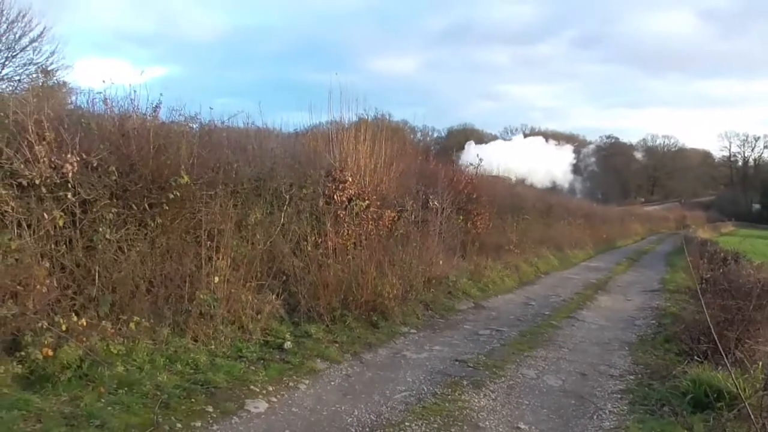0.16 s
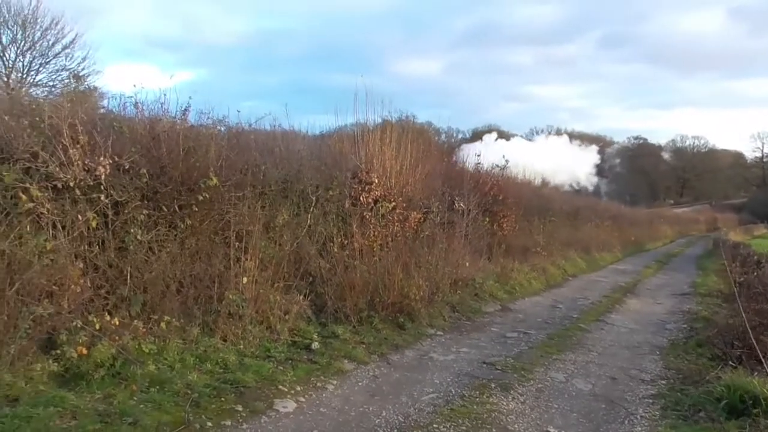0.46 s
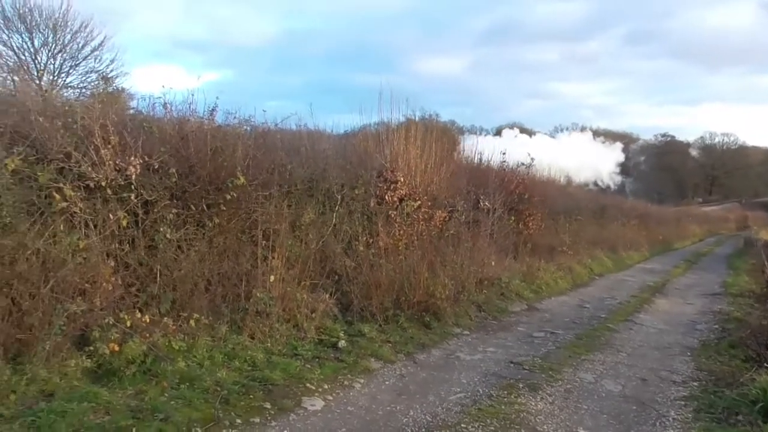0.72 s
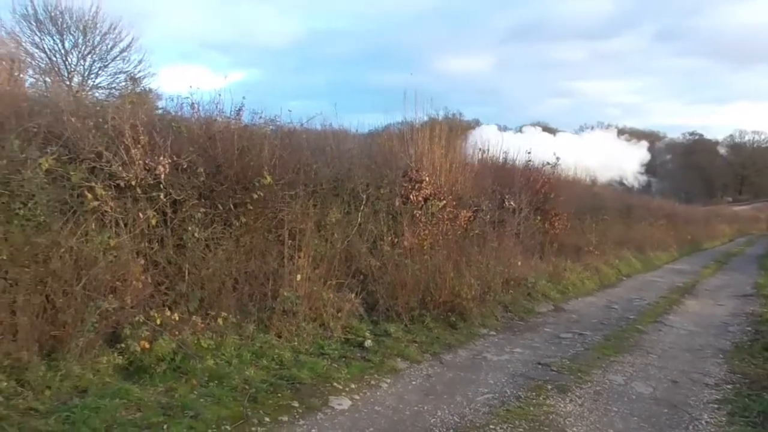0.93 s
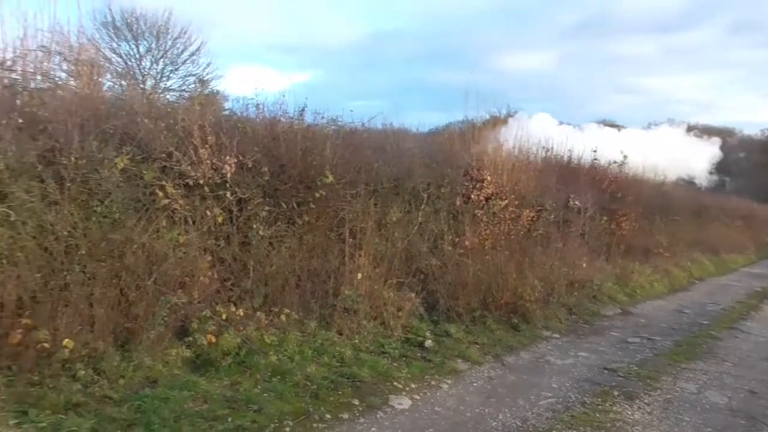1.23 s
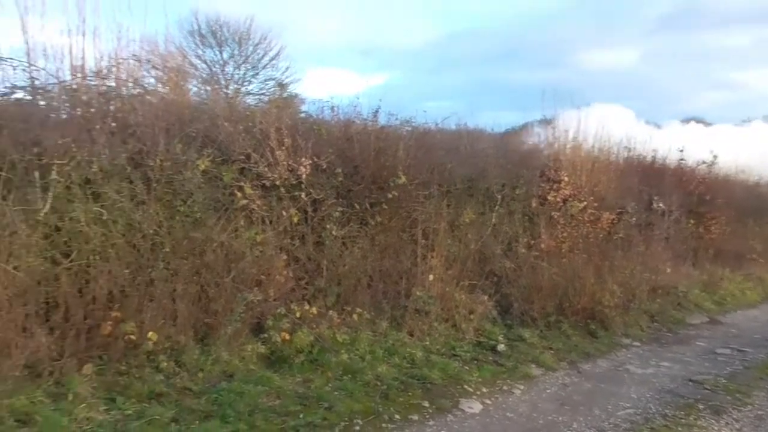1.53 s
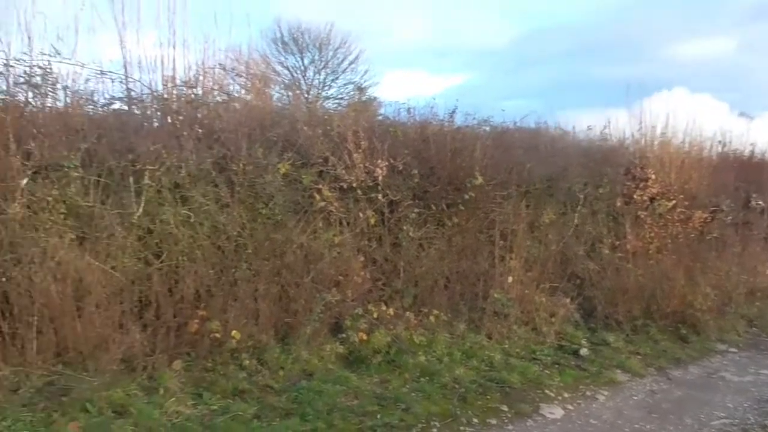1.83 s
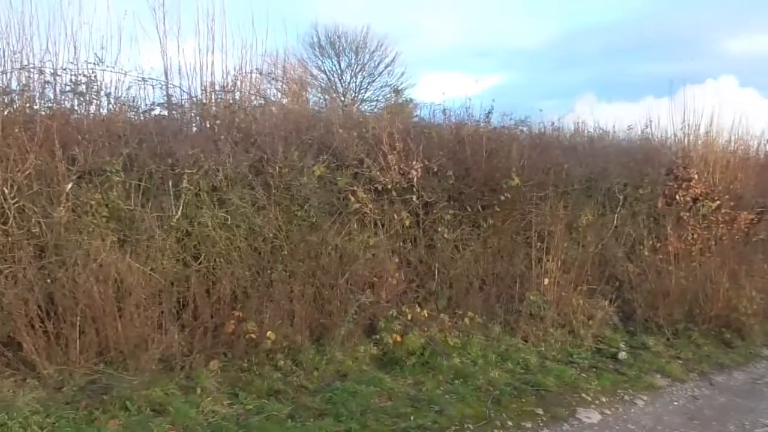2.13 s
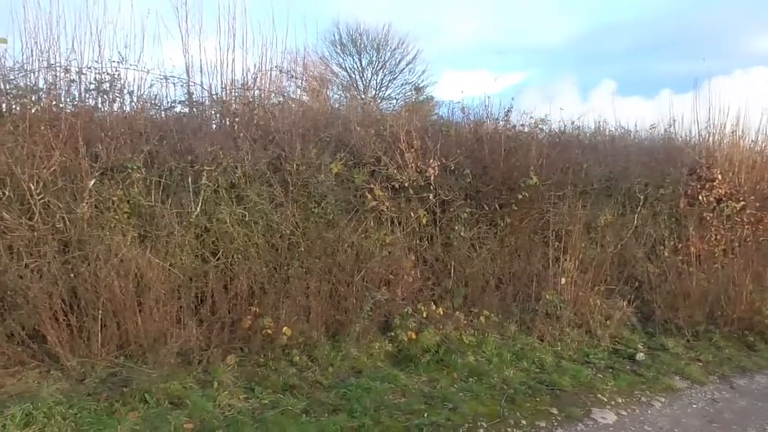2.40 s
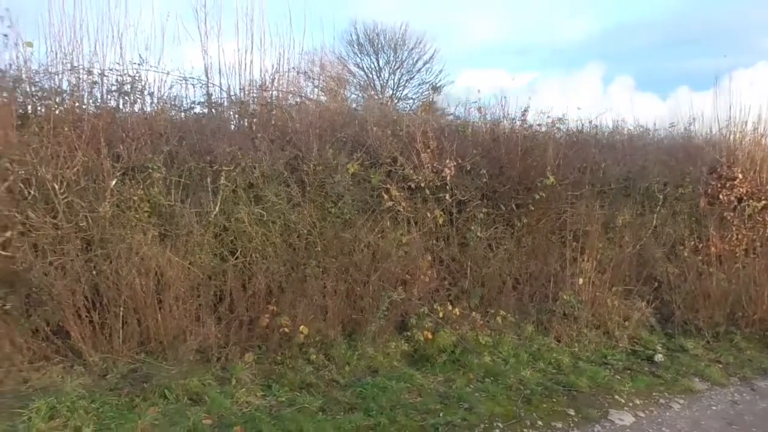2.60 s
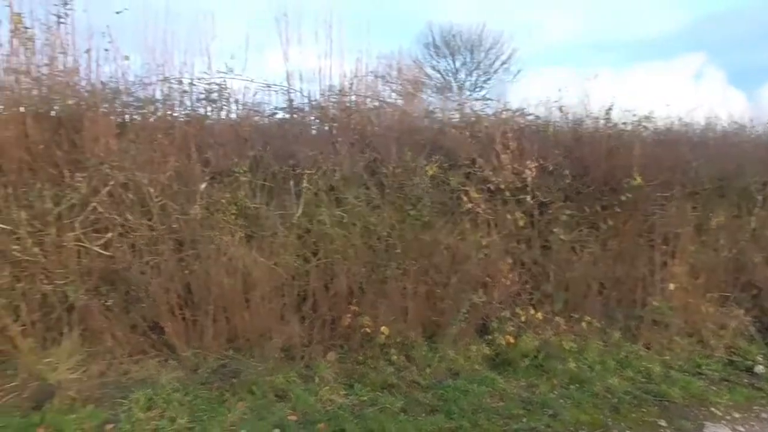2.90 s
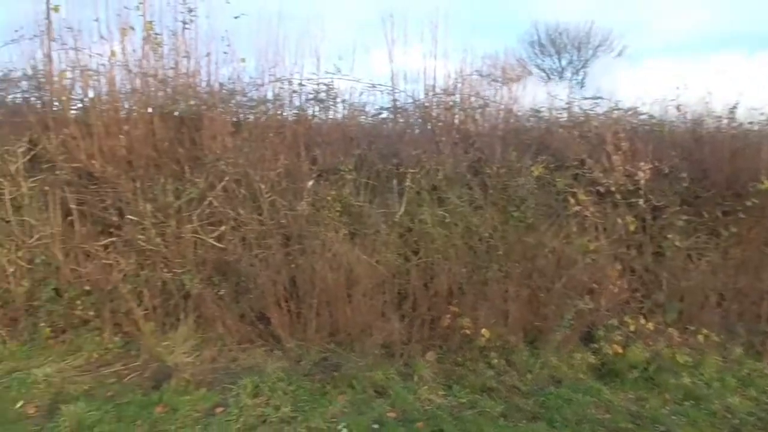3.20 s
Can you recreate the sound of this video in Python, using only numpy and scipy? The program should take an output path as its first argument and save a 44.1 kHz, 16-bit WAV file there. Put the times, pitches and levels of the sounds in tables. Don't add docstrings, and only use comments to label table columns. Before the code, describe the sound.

Loud steam train whistle stops abruptly, leaving echo and weak fluttering toots; then quick exhaust beats, low thuds and wheel rumble come nearer, with hiss and close twig ticks, outdoors on a small camera microphone.

```python
import sys
import numpy as np
from scipy import signal
from scipy.fft import rfft, irfft, next_fast_len
from scipy.io import wavfile
from scipy.ndimage import uniform_filter1d

SR = 44100
rng = np.random.default_rng(int(sys.argv[2]) if len(sys.argv) > 2 else 0)


def attenuation_scalar(level_db):
    decades = np.asarray(level_db, float) / 20
    return 10 ** decades


def transcribe(u):
    v = np.clip(np.atleast_2d(u).T, -1, 1)
    q = np.round(v * 32767).astype(np.int16)
    wavfile.write(sys.argv[1], SR, q)


N = 147735
M = next_fast_len(N)
T = np.arange(N) / SR
F = np.maximum(np.arange(M // 2 + 1) * SR / M, 1)
LEFT_RIGHT = np.array([[1], [-1]])
GAIN_TOP_DB = 19

# (time [s], gain [dB])
GAIN_CURVE = [
    (0, 2.44),
    (.38, 1),
    (.55, 5.5),
    (.75, 9),
    (1.0, 13.5),
    (1.3, 17.5),
    (2.0, 19),
    (3.35, 19),
]
# (frequency [Hz], side minus mid [dB])
STEREO_WIDTH = [(30, -10), (60, -16), (110, -29), (200, -27), (380, -10.5), (780, -17), (1290, -12),
                (2380, -12), (4400, -10.5), (8120, -2), (15000, 2)]


def column(table, index):
    return np.interp(T, np.array(table)[:, 0], np.array(table)[:, index])


def along(table, hz):
    return np.interp(np.log(hz), np.log(np.array(table)[:, 0]), np.array(table)[:, 1])


def level(x, db):
    return x * attenuation_scalar(db) / np.sqrt(np.mean(np.abs(x) ** 2))


def walk(rate):
    k = int(SR / rate)
    steps = np.repeat(rng.standard_normal(600)[:N // k + 1], k)
    return level(uniform_filter1d(uniform_filter1d(steps, k), k)[:N], 0)


def tint(x, gain):
    return irfft(rfft(x, M) * gain, M)[..., :N]


def band(x, hz, wide_hz):
    return tint(x, np.exp(-((F - hz) / wide_hz) ** 2 * 2))


def gain_at(s):
    return np.interp(s, np.array(GAIN_CURVE)[:, 0], np.array(GAIN_CURVE)[:, 1])


def bump(s, db, rise_s, fall_s):
    rise = np.sin(np.pi / 2 * np.clip((T - s) / rise_s, 0, 1)) ** 2
    return attenuation_scalar(db - gain_at(s)) * rise * np.exp(-np.maximum(T - s - rise_s, 0) / fall_s)


def whistle():
    # (time [s], pitch [Hz], level [dB], breathiness [0-1])
    valve = [(0, 962, -20, 0.1), (.17, 962, -17, 0), (.195, 962, -25, 0.2), (.228, 962, -27, 0.3),
             (.245, 962, -17, 0.04), (.274, 945.6, -18, 0.04), (.286, 800.3, -24.5, 0.3),
             (.302, 795, -31, .2), (.318, 787, -54, 0.4), (.44, 878, -44, 0.9), (.5, 898.5, -43, 0.5),
             (.9, 910, -43, 0.74), (1.2, 922, -49, 0.68), (1.45, 919.2, -45.5, 0.7),
             (1.86, 928.5, -49, 0.67), (1.89, 918, -62, 0.8), (2.2, 906, -54.5, 1), (2.8, 924, -83, 0.95)]
    # (multiple of the pitch, level at full blast [dB], drift as the engine moves [dB/s],
    #  level at both ends of the blast against its middle [dB])
    overtones = [(2, -22.5, 8, -1), (3, -19, 12, -2), (4, -20.5, -6, 7.5), (5, -17.5, -30, -12),
                 (6, -33, 63, -9), (7, -36, -5, -3), (8, -27, 0, -8), (9, -36, 26, 1.5), (10, -35, 13, 0)]
    # (frequency [Hz], density [dB per Hz])
    jet_colour = [(240, -29), (400, -34.5), (791, -20.5), (964, -4), (1060, -20), (3100, -37),
                  (3950, -30.5), (11400, -40), (15000, -46)]
    # (time [s], peak level after the gain [dB])
    gasp_times = [(0.514, -29), (0.54, -32), (0.76, -28), (0.916, -26), (0.951, -19), (1.017, -33),
                  (1.047, -18.5), (1.172, -12.5), (1.201, -13.5), (1.287, -38), (1.313, -39), (1.387, -32),
                  (1.537, -24), (1.572, -14), (1.625, -21), (1.658, -26), (1.707, -34), (1.806, -19),
                  (1.892, -38), (1.928, -19.5), (1.973, -21.5), (2.022, -22), (2.104, -18.5),
                  (2.159, -37.5)]
    full_hz, full_db, dip_share = 962, -19.5, 0.98
    jet_end_s, jet_fall_s = 0.27, 0.0023

    hz, db = column(valve, index=1), column(valve, index=2)
    breath = np.clip(column(valve, index=3), 0, 1)
    phase = 2 * np.pi * np.cumsum(hz + 3.07 * walk(29.71)) / SR

    def puff():
        flutter = (walk(89.7) + 1j * walk(89.7)) / np.sqrt(2)
        return np.sqrt(1 - breath ** 2) + breath * flutter

    tone = puff() * np.exp(1j * phase)
    sag = np.maximum(100 * (1 - hz / full_hz), 0)
    blast_place = 2 * np.minimum(T / jet_end_s, 1) - 1
    for multiple, top_db, drift_db, ends_db in overtones:
        change_db = dip_share * (full_db - db) * np.exp(-sag)
        change_db = change_db - (0.5 if multiple == 3 else 2.6) * sag
        change_db = change_db + drift_db * np.minimum(T, jet_end_s) + ends_db * blast_place ** 2
        change_db = change_db - 15 * breath ** 2
        strength = attenuation_scalar(top_db + change_db + 1.6 * walk(29.6))
        tone = tone + strength * puff() * np.exp(1j * (multiple * phase + np.pi * multiple))

    jet_gain = attenuation_scalar(along(jet_colour, F)) * (F > 240) / (1 + (F / 14200) ** 20)
    jet = level(tint(rng.standard_normal((2, N)), jet_gain), -29.5)
    jet = jet[0] + 0.26 * jet[1] * LEFT_RIGHT
    jet = jet / (1 + np.exp(np.minimum((T - jet_end_s) / jet_fall_s, 30)))

    gasps = sum(bump(s, d - 4, rise_s=0.0056, fall_s=0.016) for s, d in gasp_times) * np.exp(1j * phase)
    since = T - 0.576
    third = attenuation_scalar(-55.5 - 18.5 * since + 1.6 * walk(20.2))
    third = third * np.clip(since / 0.033, 0, 1) * np.exp(3j * phase)
    return np.sqrt(2) * attenuation_scalar(db) * tone + gasps + third, jet


def train():
    # (frequency [Hz], density [dB per Hz])
    far_low = [(15, -52), (25, -30.5), (180, 0.5), (243, -2.5), (386, -23), (829, -8), (991, -23),
               (1250, -19), (1750, -34), (2280, -61), (3850, -120)]
    far_high = [(1030, -41), (1750, -6), (2040, 2), (2760, -8.5), (4200, -6.5), (5780, -21.5),
                (6620, -22.5), (11500, -30.5), (15500, -58)]
    near_low = [(15, -58), (25, -51), (48, -16.5), (177, 0), (453, -17.5), (844, -8), (1290, -17.5),
                (1490, -15), (1750, -26), (2280, -59), (3850, -120)]
    near_high = [(1750, -7.5), (2300, -6), (4350, -7), (5800, -20.5), (6500, -16.5), (10000, -18.5),
                 (12500, -22.5), (15500, -33)]
    # (time [s], nearness [0-1])
    approach = [
        (0, 0.03),
        (2.2, 0.13),
        (2.8, 0.6),
        (3.35, 0.69),
    ]
    # (time [s], strength over the roar [dB])
    exhaust_beats = [(.22, 5), (.48, 1.5), (.71, 0), (.97, 4.5), (1.242, 6.5), (1.46, 5), (1.71, 2.5),
                     (1.981, 4.5), (2.24, 1), (2.479, 2.5), (2.748, 2), (3.03, 1), (3.271, 0.5)]
    # (frequency [Hz], share of the beat [0-1])
    beat_share = [(60, 0.85), (180, 0.76), (400, 0.83), (1000, 0.45), (4000, 0.29), (10000, .05)]
    # (frequency [Hz], left minus right [dB])
    lean = [(60, -2), (110, 0), (200, 1.5), (380, -1.5), (700, -1), (1290, -1.5), (2380, -2), (4400, -1),
            (8120, 3.5), (15000, -4)]
    rise_s, hold_s, fall_s = 0.0075, 0.077, 0.025

    def colour(low, high, low_db, high_db):
        total = 0
        for table, mask, db in ((low, F < 1750, low_db), (high, F >= 1750, high_db)):
            part = attenuation_scalar(along(table, F)) * mask
            total = total + part * attenuation_scalar(db) / np.sqrt(np.sum(part ** 2) * 2 / M)
        return total

    far = colour(far_low, far_high, -23.5, -41)
    near = colour(near_low, near_high, -19, -37)
    nearness = np.clip(column(approach, index=1), 0, 1)

    beats = np.zeros(N)
    for s, db in exhaust_beats:
        rise = np.clip((T - s) / rise_s, 0, 1)
        beats += db * rise * np.exp(-np.maximum(T - s - hold_s, 0) / fall_s)
    beats = beats - beats.mean()

    mid, side = rfft(rng.standard_normal((2, M)))
    pair = mid + attenuation_scalar(along(STEREO_WIDTH, F)) * side * LEFT_RIGHT
    pair = pair * attenuation_scalar(along(lean, F) / 2 * LEFT_RIGHT)
    out, swell = 0, walk(2.93)
    for step in range(21):
        mask = np.cos(np.pi / 2 * np.clip(2 * np.log2(F / 20) - step, -1, 1)) ** 2
        db = along(beat_share, 20 * 2 ** (step / 2)) * beats + 0.3 * swell + 0.8 * walk(9.006)
        db = db + 1.5 * np.clip(step / 5 - 2, 0, 1) * walk(60)
        far_roar = irfft(pair * mask * far, M)[:, :N]
        near_roar = irfft(pair * mask * near, M)[:, :N]
        out = out + attenuation_scalar(db) * ((1 - nearness) * far_roar + nearness * near_roar)
    return out * attenuation_scalar(-GAIN_TOP_DB)


def knocks():
    # (time [s], peak level after the gain [dB], pitch [Hz])
    thuds = [(0.706, -24.5, 225), (0.777, -22.5, 224.9), (0.86, -21.5, 153), (0.971, -21, 193),
             (1.095, -20.5, 200.7), (1.165, -20, 174), (1.253, -23, 213), (1.429, -10, 183.3),
             (1.467, -19, 173), (1.711, -8, 183.5), (1.823, -14, 121), (2.05, -20.5, 185.8),
             (2.092, -15, 210), (2.178, -26, 164), (2.261, -10.5, 227), (2.37, -14, 156), (2.482, -10, 179),
             (2.554, -6, 204), (2.754, -2.5, 203), (2.85, -7.5, 161.5), (2.916, -16, 208),
             (2.97, -16.5, 169), (3.02, -9.5, 218), (3.085, -10, 161), (3.214, -11, 198), (3.284, -8, 185)]
    rings = [(2.31, -30, 853), (2.39, -21, 947), (2.458, -14.5, 822), (2.515, -13.5, 808),
             (2.609, -13, 900), (2.68, -18, 785), (2.72, -11.5, 766), (2.785, -15.5, 742),
             (2.825, -21, 801), (2.868, -12.5, 799), (2.921, -15, 812), (3.024, -12.5, 821),
             (3.164, -12, 754), (3.217, -21, 771), (3.263, -24, 793), (3.304, -18, 800)]
    rods = [
        (2.008, -23.5, 590),
        (2.056, -21, 292.6),
        (2.112, -23, 589),
        (2.2, -19.5, 566),
        (2.364, -24, 346),
    ]
    spit_times = [
        (2.568, -26, 3770),
        (2.8363, -37, 3370),
        (3.0548, -23, 2500),
        (3.1292, -22.5, 3400),
        (3.309, -19.5, 3140),
    ]

    def struck(table, db, rise_s, fall_s):
        return sum(bump(s, d + db, rise_s, fall_s) * np.sin(2 * np.pi * hz * (T - s)) for s, d, hz in table)

    air = rng.standard_normal(N)
    spits = 0
    for s, db, hz in spit_times:
        puff = level(band(air, hz, wide_hz=1190), 0)
        spits = spits + bump(s, db - 14, rise_s=0.0031, fall_s=0.037) * puff
    low = struck(thuds, -6, rise_s=0.011, fall_s=0.014)
    high = struck([*rings, *rods], -8, rise_s=0.01, fall_s=0.026)
    return low + high + spits


def steam():
    # (centre [Hz], width [Hz], level [dB], share of the swell [0-1])
    leaks = [
        (11330, 710, -43.5, .85),
        (6550, 250, -53.5, 0.74),
        (802, 66, -43.5, 0.33),
        (950, 26, -39.5, 0.05),
        (2040, 250, -52, .1),
        (1530, 93, -40.5, 0.63),
        (2499, 99, -53, 1),
        (4500, 240, -74, 0.32),
    ]
    # (time [s], level [dB])
    leak_swell = [
        (0, -41),
        (2.3, -24),
        (2.9, -9.5),
        (3.1, -2),
        (3.35, 5.5),
    ]
    swell = column(leak_swell, index=1)
    out = 0
    for hz, wide_hz, db, share in leaks:
        mid, side = band(rng.standard_normal((2, N)), hz, wide_hz)
        pair = mid + attenuation_scalar(along(STEREO_WIDTH, hz)) * side * LEFT_RIGHT
        out = out + level(pair, db) * attenuation_scalar(share * swell + 2.2 * walk(11.0))
    dice = rng.random((3, N))
    clatter = (dice[0] < 220 / SR) * attenuation_scalar(-3.5 * np.log(1 - dice[1])) * np.sign(dice[2] - .5)
    clatter = level(band(clatter, hz=3300, wide_hz=2500), -48)
    return (out + clatter * attenuation_scalar(swell)) * attenuation_scalar(-GAIN_TOP_DB)


def hedge():
    # (time [s], peak level [dB], ring [Hz], left minus right [dB])
    ticks = [
        (0.4623, -14, 10100, -7),
        (1.242, -32, 8500, 3),
        (1.3594, -40, 8280, 11),
        (1.498, -34, 6550, 8),
        (1.6548, -27, 10140, 4),
        (1.6696, -35, 9490, 19),
        (1.7066, -18.5, 8070, -6),
        (1.7255, -40, 7780, -1),
        (1.919, -45, 7610, -6),
        (1.9719, -43, 7850, 19),
    ]
    # (start [s], length [s], level [dB])
    rustles = [
        (0.939, 0.48, -50.5),
        (1.594, 0.095, -58),
        (1.87, 0.073, -56),
        (2.04, 0.096, -52),
        (2.2, 0.53, -54.5),
        (3.103, 0.68, -43),
    ]
    rustle_hz, rustle_wide_hz = 9300, 7000

    out = np.zeros((2, N))
    fizz = level(band(rng.standard_normal(N), rustle_hz, rustle_wide_hz), 0)
    for s, db, hz, pan in ticks:
        after = T - s - 0.00055
        click = np.exp(-(after / 0.00013) ** 2) * np.sin(2 * np.pi * hz * after)
        tail = attenuation_scalar(-11.5) * np.exp(-abs(after) / 0.00056) * fizz
        out += attenuation_scalar(db - GAIN_TOP_DB + pan * LEFT_RIGHT / 2) * (click + tail)

    dice = rng.random((3, 2, N))
    grains = (dice[0] < 1800 / SR) * attenuation_scalar(-np.log(1 - .97 * dice[1])) * np.sign(dice[2] - .5)
    grains = (grains + .9 * grains[1]) * attenuation_scalar(-1.5 * LEFT_RIGHT)
    patches = 0
    for s, long, db in rustles:
        arch = np.sqrt(np.sin(np.pi * np.clip((T - s) / long, 0, 1)).clip(0))
        patches = patches + attenuation_scalar(db) * arch * attenuation_scalar(0.5 * walk(39.7))
    return out + level(band(grains, rustle_hz, rustle_wide_hz), -GAIN_TOP_DB) * patches


def fields(x):
    late = np.maximum(T - .045, 0)

    def tail(db, t60_s):
        decay = level(np.exp(-np.log(1000) * late / t60_s), db)
        return rng.standard_normal((2, N)) * (late > 0) * decay / np.sqrt(N)

    echo = tail(-7, t60_s=0.38) + tint(tail(-15.5, t60_s=2.07), 1 / (1 + (F / 1540) ** 2))
    mid, side = tint(echo, attenuation_scalar(5 * np.exp(-np.log2(F / 2920) ** 2 * 2)))
    reply = mid + .65 * side * LEFT_RIGHT
    lead = SR // 2
    before = np.pad(x, ((0, 0), (lead, 0)), mode="reflect")
    return signal.fftconvolve(before, reply[:, :2 * SR], axes=1)[:, lead:lead + N]


def scene():
    tone, jet = whistle()
    turn = np.exp(1j * (0.32 + 0.05 * walk(5.4)) * LEFT_RIGHT)
    direct = (tone * turn).real * attenuation_scalar(-.4 * LEFT_RIGHT) + jet
    return direct + fields(direct) + train() + steam() + hedge() + knocks()


def roll_off(x):
    return signal.sosfilt(signal.butter(12, 15610, fs=SR, output="sos"), x)


def record(dry):
    mix = dry * attenuation_scalar(column(GAIN_CURVE, index=1))
    return roll_off(mix)


dry = scene()
out = record(dry)
transcribe(out)
```